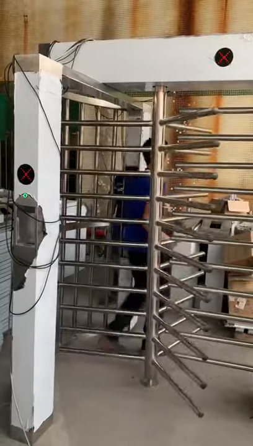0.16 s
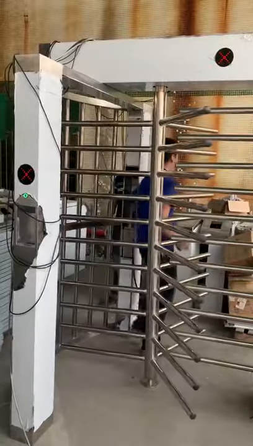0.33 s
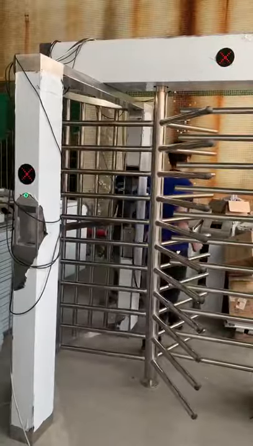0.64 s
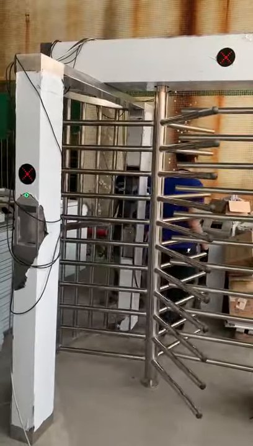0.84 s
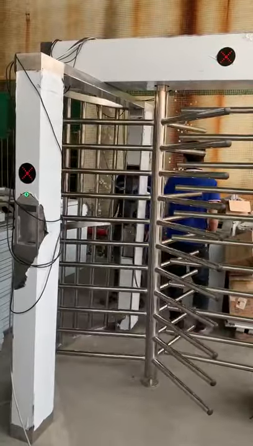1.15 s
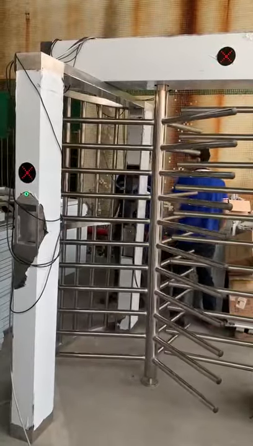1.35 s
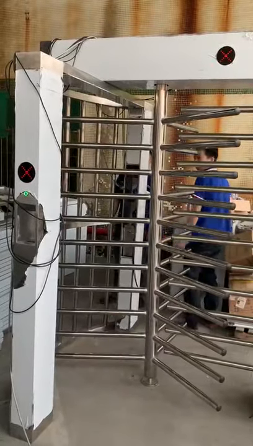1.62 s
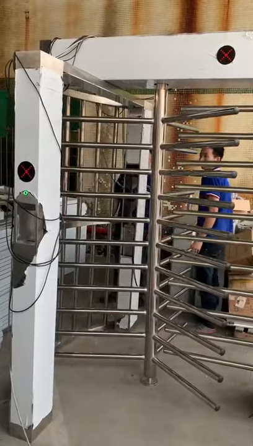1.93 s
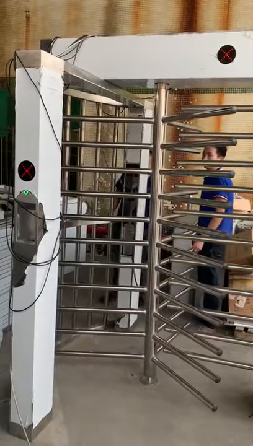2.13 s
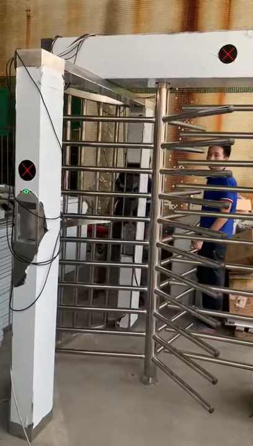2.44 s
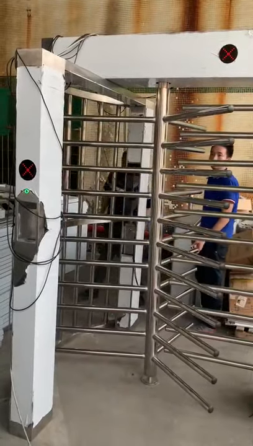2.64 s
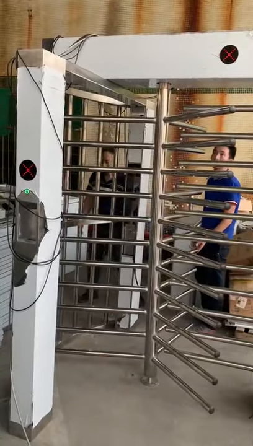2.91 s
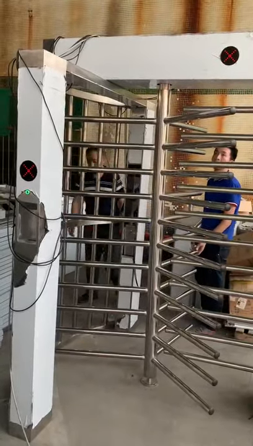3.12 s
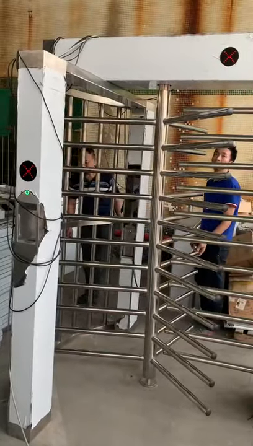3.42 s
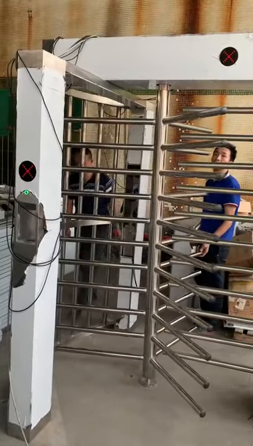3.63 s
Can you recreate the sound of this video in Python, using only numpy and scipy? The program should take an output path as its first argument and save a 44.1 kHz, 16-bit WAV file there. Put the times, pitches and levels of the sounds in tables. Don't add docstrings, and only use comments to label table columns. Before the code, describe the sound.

A full-height steel turnstile rattles immediately, its hollow housing thudding in a rapid cluster from 0.1 to 0.4 s, with sharp ticks and gritty scrapes. Softer scuffs follow, with a faint, wavering high bearing whine from 0.45 to 1.3 s. Small clacks and scrapes return around 1.35-1.6 and 1.9 s. Mostly low fan and machine rumble remains, then dry close latch clicks at 3.4 and 3.6 s. Reverberant workshop, dull phone sound.

```python
import sys
import numpy as np
from scipy import signal
from scipy.fft import rfft, irfft
from scipy.io import wavfile
from scipy.ndimage import uniform_filter1d

SR = 44100
rng = np.random.default_rng(int(sys.argv[2]) if len(sys.argv) > 2 else 0)


def volts_from_db(level):
    exponent = np.asarray(level, float) / 20
    return 10 ** exponent


def dump(signal):
    limited = np.clip(np.atleast_2d(signal).T, -1, 1)
    pcm = np.round(limited * 32767).astype(np.int16)
    wavfile.write(sys.argv[1], SR, pcm)


N = 166257
t = np.arange(N) / SR
f = np.maximum(np.fft.rfftfreq(N, 1 / SR), 1)

# start in seconds, level in dB.
RATTLE_HITS = [(.016, -42.5), (.039, -46), (.053, -40.5), (.066, -46), (.08, -41), (.102, -38.5),
               (.121, -46), (.136, -43), (.155, -53), (.18, -46), (.219, -48), (.276, -49), (.345, -53),
               (.413, -56), (1.36, -61), (1.55, -66), (1.6, -63)]
# frequency in Hz, level in dB, T60 in seconds.
ARM_MODES = [(710, -4, .05), (930, -2, .06), (1160, -1, .05), (1350, -4, .04), (1530, 0, .05),
             (1880, -1, .05), (1990, -3, .05), (2180, -2, .06), (2340, -5, .05), (2690, -6, .05),
             (2830, -8, .05), (3430, -11, .03), (3900, -13, .03), (4430, -15, .03)]
# start in seconds, level in dB.
CLUNK_HITS = [(.108, -36), (.122, -39), (.143, -40), (.163, -40), (.185, -40), (.205, -40.5), (.225, -41),
              (.248, -41), (.28, -43), (.32, -43), (.36, -46), (.4, -47)]
# frequency in Hz, level in dB, T60 in seconds.
HOUSING_MODES = [(228, -4, .25), (268, -6, .22), (299, -3, .23), (345, -2, .2), (404, -3, .2),
                 (452, -5, .2), (500, -11, .2)]
# start in seconds, level in dB, extra brightness in dB.
PAWL_TICKS = [(.1207, -48, 14.5), (0.143, -49, 14), (.407, -50, 15), (.6185, -57, 6), (.625, -55.5, 13),
              (.8405, -69, 12), (.906, -76, 9), (.969, -71, 12), (1.186, -74, 12), (1.223, -72, 13),
              (1.347, -62, 9), (1.491, -57, -2), (1.52, -60, 8), (1.542, -61, 15), (1.565, -55, 10),
              (1.885, -61, 2), (1.909, -57, 5)]
# start in seconds, length in seconds, level in dB, extra brightness in dB.
SCRAPE_STROKES = [(-.01, 0.078, -44, -0.5), (0.041, 0.049, -43, -8), (.1, 0.02, -57, 9),
                  (0.128, 0.035, -46.5, 5), (0.164, 0.12, -52.5, -11), (0.407, 0.06, -53, -0.5),
                  (0.608, 0.076, -49.5, -5.5), (0.816, 0.042, -62.5, -15), (0.922, 0.063, -64.5, -9),
                  (1.153, 0.13, -68, -8), (1.338, 0.059, -55.5, -7.5), (1.47, 0.095, -56, -4),
                  (1.531, 0.13, -51.5, -5.5), (1.875, 0.061, -55.5, -6)]
# frequency in Hz, density in dB per Hz.
SCRAPE_SPECTRUM = [(700, 0.5), (1600, 7), (3000, -1), (5000, -9), (6800, 0.5), (8600, -10.5), (11000, -2.5),
                   (13000, -10.5)]
# time in seconds, level in dB.
WHINE_LEVEL = [
    (.35, -90),
    (.45, -74),
    (.64, -73),
    (.68, -67),
    (.9, -66),
    (.94, -73),
    (1.19, -72),
    (1.27, -67),
    (1.36, -90),
]
# start in seconds, level in dB, extra brightness in dB.
LATCH_CLICKS = [
    (3.374, -53, 0),
    (3.3835, -52.5, -2),
    (3.393, -61, -10),
    (3.5755, -56.5, 3),
    (3.58, -63, 2),
]
# frequency in Hz, level in dB, T60 in seconds.
LATCH_MODES = [(2750, 3, .016), (3080, 3, .014)]
# frequency in Hz, density in dB per Hz.
HALL_SPECTRUM = [(20, -12), (45, 0), (64, -3), (82, -8.5), (120, -6.5), (300, -13), (580, -22),
                 (1300, -22.5),
                 (1850, -26.5), (2250, -33.5), (3200, -39), (4500, -48.5), (6000, -50), (8500, -64),
                 (11500, -62.5), (12800, -71)]
# frequency in Hz, width in Hz, level in dB.
HUM_LINES = [(58.6, 5.2, -46.5), (304.3, 5.5, -55.5), (323, 1.1, -59), (647, 3.6, -66), (944, 55, -60.5),
             (2140, 8.5, -74)]
# centre in Hz, width in Hz, depth in dB, wander in Hz.
NOTCHES = [(4890, 400, -30, 55), (9060, 640, -28, 110), (13220, 700, -28, 90)]
# frequency in Hz, threshold in dB.
DROPOUT_THRESHOLD = [(600, -24.5), (1400, -20), (2200, -10), (3800, -3), (6000, -3), (8000, 4), (10000, 0),
                     (13000, 3)]
# start in seconds, end in seconds, low Hz, high Hz, depth in dB.
DULL_MOMENT = (.101, .12, 3100, 10200, -7)


def level(x, db=0):
    return x * volts_from_db(db) / np.sqrt(np.mean(x ** 2))


def shape(x, gain):
    return irfft(rfft(x) * gain, N)


def coloured_noise(gain):
    return shape(rng.standard_normal(N), gain)


def curve(points):
    hz, db = np.array(points, float).T
    return np.interp(np.log(f), np.log(hz), db) - 12 * np.clip(np.log2(hz[0] / f), 0, 9)


def walk(rate_hz):
    return level(coloured_noise(1 / (1 + (f / rate_hz) ** 2)))


def ring(hits, modes, chatter_s, scatter_db):
    detune = 0.015
    out = np.zeros(N + SR)
    chance = rng.standard_normal((len(hits), len(modes), 2))
    u = t[:SR // 4]
    bursts = rng.standard_normal((len(hits), len(u))) * np.exp(-u / chatter_s)
    for hit, draws, burst in zip(hits, chance, bursts):
        body = 0
        for (hz, db, t60), (strength, offset) in zip(modes, draws):
            decay = volts_from_db(db + scatter_db * strength - 60 * u / t60)
            body = body + decay * np.sin(2 * np.pi * hz * (1 + detune * offset) * u)
        sound = signal.fftconvolve(body, burst) / np.sqrt(np.sum(burst ** 2))
        start = int(hit[0] * SR)
        out[start:start + len(sound)] += volts_from_db(hit[1]) * sound
    return out[:N]


def contact_noise(envelopes, rows):
    noise = level(coloured_noise(volts_from_db(curve(SCRAPE_SPECTRUM) + 1.5 * (f > 13300))))
    high = shape(noise, 1 / (1 + (8800 / f) ** 12))
    low = noise - high
    return sum(env * (low + volts_from_db(row[-1]) * high) for env, row in zip(envelopes, rows))


def lock_rattle():
    return ring(RATTLE_HITS, ARM_MODES, chatter_s=0.01, scatter_db=2)


def housing_clunk():
    return ring(CLUNK_HITS, HOUSING_MODES, chatter_s=0.012, scatter_db=2)


def ticks(rows, t60):
    envelopes = [(t >= s) * volts_from_db(db - 60 * np.clip(t - s, 0, 1) / t60) for s, db, _ in rows]
    return contact_noise(envelopes, rows)


def scrapes():
    attack, release_s = 0.11, 0.012
    envelopes = []
    for start, length, db, _ in SCRAPE_STROKES:
        rise = np.clip((t - start) / (attack * length), 0, 1)
        release = np.exp(-np.clip(t - start - length, 0, None) / release_s)
        envelopes.append(volts_from_db(db) * rise * release)
    grit_db = -1 * walk(150) + 2 * walk(33)
    return contact_noise(envelopes, SCRAPE_STROKES) * volts_from_db(grit_db)


def bearing_whine():
    db = np.interp(t, *np.array(WHINE_LEVEL, float).T) + 2.5 * walk(9)
    hz = 2413 * (1 + 0.0008 * walk(5))
    return np.sqrt(2) * volts_from_db(db) * np.sin(2 * np.pi * np.cumsum(hz) / SR)


def close_latch():
    snap = ticks(LATCH_CLICKS, t60=0.011)
    return snap + ring(LATCH_CLICKS[:3], LATCH_MODES, chatter_s=1 / 2000, scatter_db=1)


def room(x):
    t60_s, treble_t60_s, room_db = 1, 0.47, -6
    noise = rng.standard_normal(N) * np.clip(t / 0.0063, 0, 1)
    low = shape(noise, 1 / (1 + (f / 4000) ** 2))
    tail = low * volts_from_db(-60 * t / t60_s) + (noise - low) * volts_from_db(-60 * t / treble_t60_s)
    tail = tail[:SR]
    tail = tail * volts_from_db(room_db) / np.sqrt(np.sum(tail ** 2))
    return signal.fftconvolve(x, tail)[:N]


def hall():
    hall_db, swell_db, flicker_db = -38.5, 0.5, 0.9
    top_db = 3 * (f > 13750) - 8 * ((f > 12400) & (f < 13750))
    colour = volts_from_db(curve(HALL_SPECTRUM) + top_db)
    swell = walk(0.61)
    air = 0
    for octave in np.arange(0, 10.5, .5):
        band = np.cos(np.pi / 2 * np.clip(2 * (np.log2(f / 16) - octave), -1, 1))
        air = air + coloured_noise(colour * band) * volts_from_db(swell_db * swell + flicker_db * walk(19))
    lines = sum(level(coloured_noise(1 / (1 + (2 * (f - hz) / width) ** 2)), db)
                for hz, width, db in HUM_LINES)
    return level(air, hall_db) + lines


def patchy_treble(x):
    frame, grid = 1024, 784
    notch_hold, notch_scatter_db = 3, 6
    threshold_scatter_db, sharp_db = 5, -14

    n, k = np.arange(2 * frame), np.arange(frame)
    cell_hz = (k + .5) * SR / 2 / frame
    window = np.sin(np.pi * (n + .5) / (2 * frame))
    basis = window[:, None] * np.cos(np.pi / frame * np.outer(n + .5 + frame / 2, k + .5))
    lead = 2 * frame - grid
    hops = np.pad(x, (lead, 2 * frame + (-lead - N) % frame), mode="reflect").reshape(-1, frame)
    cells = np.hstack([hops[:-1], hops[1:]]) @ basis

    def held(count):
        return np.repeat(rng.standard_normal((len(cells), count)), notch_hold, axis=0)[:len(cells)]

    for hz, width, depth, wander in NOTCHES:
        move, deepen = held(2).T[:, :, None]
        dip = np.exp(-(2 * (cell_hz - hz - wander * move) / width) ** 2)
        cells *= volts_from_db((depth + notch_scatter_db * deepen) * dip)

    local = np.sqrt(np.abs(uniform_filter1d(cells ** 2, size=64, axis=1))) + 1e-12
    scatter = threshold_scatter_db * np.repeat(held(frame // 16), 16, axis=1)
    sharp_s = np.array([row[0] for row in [*PAWL_TICKS, *LATCH_CLICKS] if row[1] > -65])
    sharp = ((sharp_s * SR + lead) // frame).astype(int)
    scatter[np.r_[sharp - 1, sharp]] += sharp_db
    step = local * volts_from_db(np.interp(cell_hz, f, curve(DROPOUT_THRESHOLD)) + scatter)
    back = (cells * (np.abs(cells) > step / 2)) @ basis.T * 2 / frame
    return (back[1:, :frame] + back[:-1, frame:]).ravel()[lead - frame:][:N]


def scene():
    turnstile = lock_rattle() + housing_clunk() + ticks(PAWL_TICKS, t60=0.045)
    near = turnstile + scrapes()
    return (near + room(near) + bearing_whine() + close_latch() + hall())[None]


def top_cut(x):
    return signal.sosfilt(signal.butter(12, 14300, fs=SR, output="sos"), x)


def record(dry):
    x = patchy_treble(shape(dry[0], 1 / (1 + (f / 14130) ** 200)))
    start, end, low, high, db = DULL_MOMENT
    moment = uniform_filter1d(1. * ((t > start) & (t < end)), size=90)
    mid_treble = shape(x, (f > low) & (f < high))
    mix = x - (1 - volts_from_db(db)) * moment * mid_treble
    return top_cut(mix[None])


dry = scene()
out = record(dry)
dump(out)
```